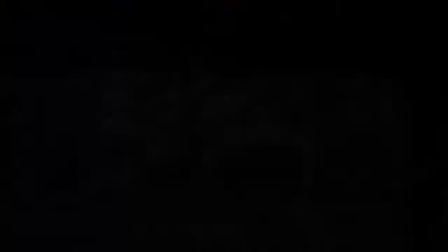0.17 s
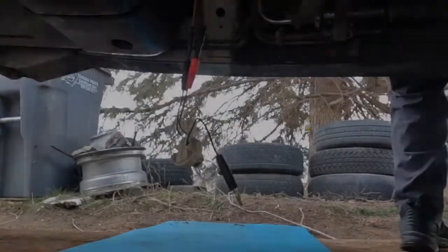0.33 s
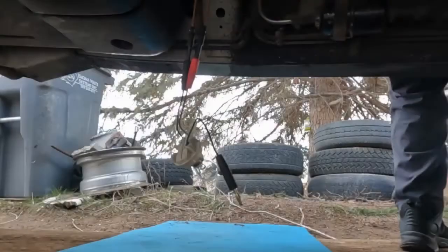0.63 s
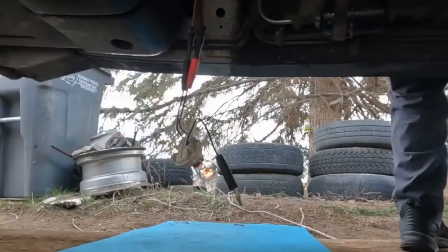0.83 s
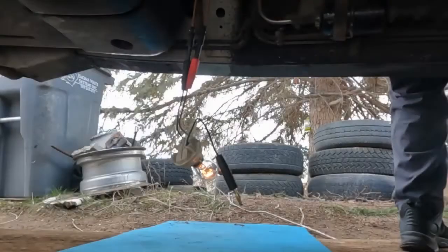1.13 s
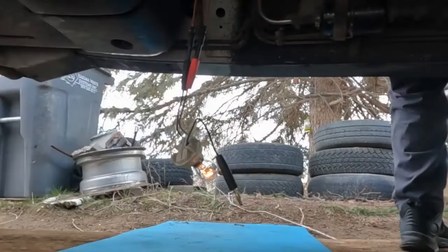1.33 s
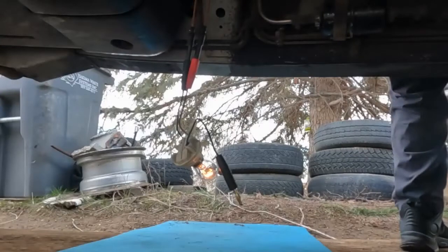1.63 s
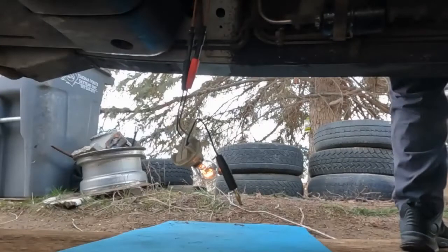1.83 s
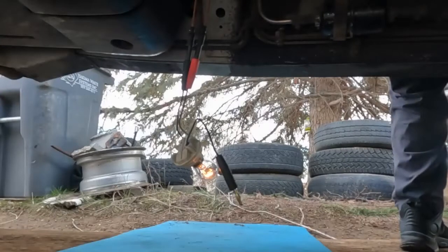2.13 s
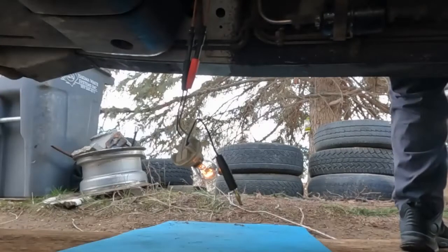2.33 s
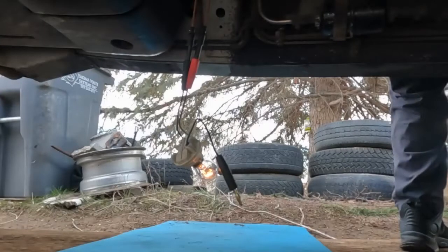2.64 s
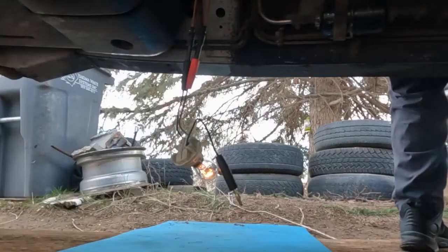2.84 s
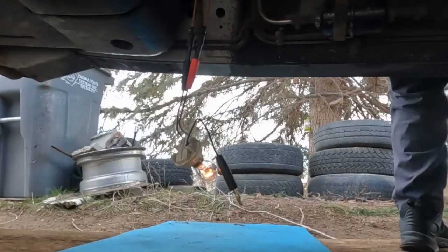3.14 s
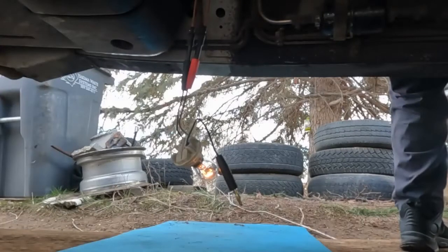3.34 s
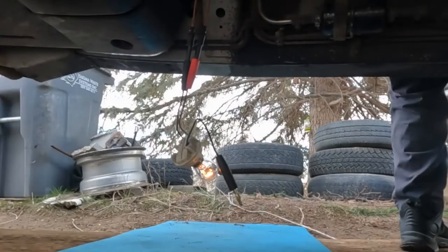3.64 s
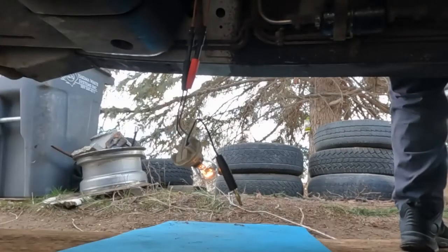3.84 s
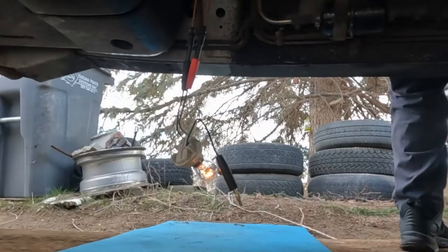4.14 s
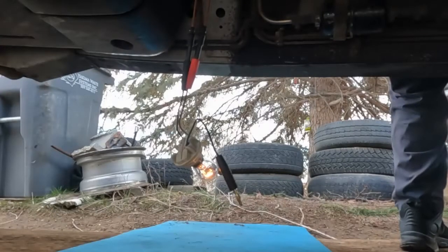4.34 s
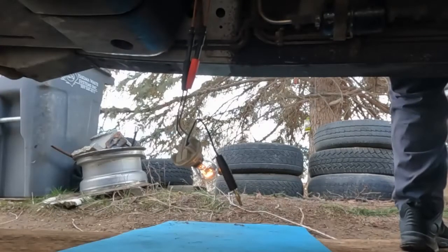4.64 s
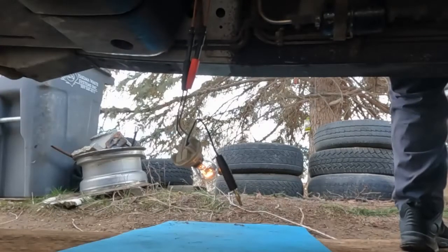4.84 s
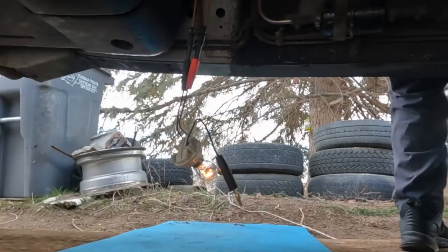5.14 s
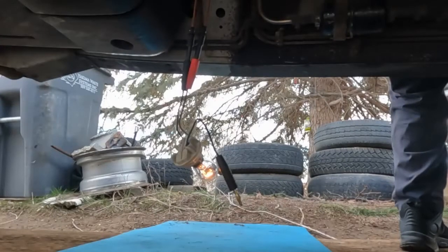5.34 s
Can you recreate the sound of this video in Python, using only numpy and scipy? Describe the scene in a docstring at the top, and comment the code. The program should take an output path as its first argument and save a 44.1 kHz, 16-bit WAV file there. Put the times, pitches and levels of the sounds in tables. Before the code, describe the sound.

The microphone sits beneath a parked vehicle outdoors, close to an electric fuel pump that gives a thin, steady buzz and hum throughout. Faint birds twitter in the distance in the first moments. At about 0.3 seconds a loud, dull thump and a short scuffle hit the microphone, with a low rumble that cuts off abruptly at 0.4 seconds. At 0.7 seconds the starter engages with a quick metallic clatter and spins up in a rising whine, and the hum swells briefly around 1.1 seconds. From 1.2 seconds the engine cranks in a fast, even rhythm, about five strokes a second. Each stroke has a soft knock, a grinding gear whine that dips in pitch, and a low exhaust puff. The engine never fires, and the cranking is still going at the end, around 5.5 seconds.

```python
"""Cranking without a start, under a parked vehicle

One microphone beneath the floor pan, close to the electric fuel pump, which buzzes throughout. Birds
twitter farther off and something thumps near the microphone. Then the starter engages and cranks the
engine, which never fires: every compression stroke loads and slows the pinion, whose teeth whine
through the bell housing, and ends in a low puff from the exhaust."""
import sys
import numpy as np
from scipy import signal
from scipy.fft import rfft, irfft, next_fast_len
from scipy.io import wavfile
from scipy.ndimage import uniform_filter1d, map_coordinates

SR = 44100
rng = np.random.default_rng(int(sys.argv[2]) if len(sys.argv) > 2 else 0)


def master(y):
    """Save y as 16-bit WAV."""
    cut = np.clip(np.atleast_2d(y).T, -1, 1)
    pcm = np.round(cut * 32767)  # scale
    wavfile.write(sys.argv[1], SR, pcm.astype(np.int16))


N = 241888

# compression strokes: start_s, top_tooth_hz, slowest_tooth_hz, knock_db
COMPRESSIONS = [(1.216, 1212, 884.4, -27.5), (1.444, 1375, 1107, -25), (1.604, 1365, 1093, -26),
                (1.787, 1396, 1084, -28), (1.972, 1325, 1092, -26), (2.135, 1375, 897.4, -27),
                (2.355, 1253, 926, -23), (2.563, 1323, 1106, -22), (2.725, 1399, 1048, -26),
                (2.911, 1345, 1054, -24.5), (3.097, 1374, 1082, -22), (3.273, 1317, 998.5, -26.5),
                (3.476, 1277, 1034, -23), (3.667, 1323, 1093, -24.5), (3.839, 1317, 1019, -25.5),
                (4.035, 1335, 1025, -23.5), (4.225, 1278, 1035, -24), (4.404, 1276, 1032, -25.5),
                (4.605, 1250, 1040, -26), (4.795, 1311, 1089, -26), (4.97, 1362, 1037, -26.5),
                (5.163, 1284, 1024, -28), (5.359, 1333, 1014, -22.5)]
USUAL_GAP_S = .19  # from stroke to stroke


def amp(db):
    """Gain of a level in dB."""
    return 10 ** (np.asarray(db) / 20)


def unit(x):
    """Scaled to rms 1."""
    return x / np.sqrt(np.mean(x ** 2) + 1e-20)


def curves(rows):
    """One value per sample for each column after the time."""
    s, *cols = np.transpose(rows)
    return [np.interp(np.arange(N) / SR, s, c) for c in cols]


def smooth(x, seconds):
    """Two running means round the corners."""
    size = max(int(seconds * SR), 1)
    return uniform_filter1d(uniform_filter1d(x, size), size)


def filtered(x, response):
    """x times a complex response of frequency."""
    m = next_fast_len(N + SR // 2)
    return irfft(rfft(x, m) * response(np.fft.rfftfreq(m, 1 / SR)), m)[..., :N]


def resonant(x, modes):
    """x through parallel resonances, neighbours in opposite phase, each with an optional lag."""
    out = np.zeros(N)
    for k, (hz, width, db, *lag_ms) in enumerate(modes):
        ring = signal.lfilter(*signal.iirpeak(hz, hz / width, SR), x)
        out += (-1) ** k * amp(db) * np.roll(ring, round(sum(lag_ms) * SR / 1000))
    return out


def noise(spectrum):
    """Noise of rms 1 coloured by rows of freq_hz, level_db."""
    f, db = np.transpose(spectrum)
    white = rng.standard_normal(N)
    return unit(filtered(white, lambda hz: amp(np.interp(np.log(hz + 1), np.log(f), db, -120))))


def wobble(rate):
    """A smooth random curve, rate knots a second."""
    return map_coordinates(rng.standard_normal(int(N * rate / SR) + 4), [np.arange(N) * rate / SR])


def clicks(turns, count):
    """One click per whole turn: the sum of count equal harmonics."""
    half = np.pi * (turns % 1) + 1e-9
    return np.sin((2 * count + 1) * half) / np.sin(half) - 1


def cranking():
    """The pinion runs fastest as a stroke takes load, slowest shortly before it lets go."""
    # starter spinning up: time_s, tooth_hz, load_db
    spin_up = [(0.7, 298, -64), (.715, 328.5, -24.5), (.78, 642, -40), (0.829, 851, -30), (0.871, 900, -41),
               (0.901, 982, -32), (0.959, 1117, -29), (1.031, 946, -28.5), (1.09, 725, -29.5),
               (1.123, 701, -33.5), (1.164, 920, -45)]
    load_db, loaded_share = -26.5, .63  # share of the time to the next stroke
    speed = [(s, hz) for s, hz, _ in spin_up]
    load = [(s, db) for s, _, db in spin_up]
    gaps = np.append(np.diff([row[0] for row in COMPRESSIONS]), USUAL_GAP_S)
    for (s, top_hz, low_hz, _), gap in zip(COMPRESSIONS, gaps):
        length = loaded_share * gap
        speed += [(s - .01, top_hz), (s + .015, top_hz), (s + .68 * length, low_hz * 1.02),
                  (s + .85 * length, low_hz), (s + length, low_hz * 1.02)]
        load += [(s - .006, load_db - 25), (s + .005, load_db + .82),
                 (s + length - .015, load_db - 4.5), (s + length + .014, load_db - 21)]
    running = np.arange(N) > spin_up[0][0] * SR
    return smooth(curves(speed)[0], .015), running * amp(curves(load)[0]), running


def starter(tooth_hz, load, running):
    """Unevenly worn teeth click into the housing; the armature sings at three times the tooth rate."""
    # bell housing and starter body: pitch_hz, width_hz, level_db
    housing_modes = [(622, 33, -2.5), (910, 56, -4.5), (1086, 51, -2), (1174, 16.5, 4.5), (1272, 44, -2.5),
                     (1421, 58, -3), (1653, 18, -0.5), (1775, 24, 2.5), (2010, 96, -4.5),
                     (2115, 490, -12.5), (2860, 58, -19.5), (3120, 146, -6), (7630, 95, 3.5)]
    # starter can: pitch_hz, width_hz, level_db
    can_modes = [(1780, 60, -7), (2775, 70, 1), (3100, 200, -16), (3600, 1100, -18)]
    # grinding gears: freq_hz, level_db
    grind_spectrum = [(60, -13), (200, 1), (350, -9.5), (640, -4.5), (850, -10), (1300, -9.5), (2200, -9.5),
                      (3500, -17), (5500, -14.5), (7200, -20), (7700, -27), (8300, -20), (15000, -28)]
    # brush hiss: freq_hz, level_db
    brush_spectrum = [(200, -32), (640, -0.5), (1000, -8), (1750, 2.5), (2400, -6), (4000, -6), (6000, -9),
                      (8000, -8.5), (10500, -15), (13000, -24), (15500, -36)]
    teeth = np.cumsum(tooth_hz * (1 + .0223 * wobble(120))) / SR
    tooth = np.floor(teeth + .5).astype(int)
    pinion_angle = 2 * np.pi * tooth / 11  # eleven teeth
    # the pinion runs out of true: lines each side of the whine
    runout = .82 * np.cos(pinion_angle) + .31 * np.cos(2 * pinion_angle + 1.3)
    wear = .64 * rng.standard_normal(tooth[-1] + 1)[tooth]
    rattle = unit(clicks(teeth, count=2)) * (1 + runout + wear)
    rattle += .5 * amp(2.1 * wobble(90)) * rng.standard_normal(N)
    whine = 1.29 * resonant(load * rattle, housing_modes)
    grind = smooth(load, .016) * (tooth_hz / 1200) ** .96 * amp(2.3 * wobble(70)) * noise(grind_spectrum)
    spin = np.cumsum(tooth_hz * (1 + .02055 * wobble(140))) / SR
    armature = np.sin(6 * np.pi * spin) * (1 + .26 * np.cos(pinion_angle)) * amp(4.3 * wobble(80))
    armature *= np.clip((tooth_hz - 600) / 300, 0, 1)  # comes in with speed
    armature *= np.clip((1330 - tooth_hz) / 200, .15, 1)  # fades as it races free
    brushes = running * amp(-42.5 + 2.3 * wobble(30)) * noise(brush_spectrum)
    return whine + amp(-8) * grind + amp(-28) * resonant(armature, can_modes) + brushes


def engine(load):
    """The engine knocks as slack is taken up, puffs down the pipe and shakes the floor pan under load."""
    # exhaust and floor pan: pitch_hz, width_hz, level_db
    underbody_modes = [(32, 10, -1), (97.3, 56, -12.5), (178, 53.6, -12)]
    first_puff_s, first_puff_db = .834, -16.5
    puff_after_s, puff_db, puff_db_per_s = .105, -22, 60  # louder after a longer wait
    t = np.arange(SR // 5) / SR
    out = np.zeros(N + SR)
    envelope = t / .012 * np.exp(1 - t / .013)
    for (s, *_, knock_db), (tuning, phase) in zip(COMPRESSIONS, rng.random((len(COMPRESSIONS), 2))):
        knock = np.sin(2 * np.pi * ((95 + 25 * tuning) * t + phase))
        knock += .32 * np.sin(2 * np.pi * (170 + 40 * phase) * t)
        out[round(s * SR):][:len(t)] += amp(knock_db - 5) * envelope * knock
    starts = np.array([row[0] for row in COMPRESSIONS])
    waits = np.diff(starts, prepend=starts[0] - USUAL_GAP_S)
    puffs = zip(starts + puff_after_s, puff_db + puff_db_per_s * (waits - USUAL_GAP_S))
    u = t - .06  # a suck, the push at u = 0, then the pipe swings out
    swing = np.where(u < 0, np.exp(-(u / .025) ** 2), np.exp(-u / .04))
    for s, db in [(first_puff_s, first_puff_db), *puffs]:
        out[round((s - .06) * SR):][:len(t)] += amp(db) * swing * np.cos(2 * np.pi * 34 * u)
    shake = (load + amp(-34) * (load > 0)) * unit(resonant(rng.standard_normal(N), underbody_modes))
    return out[:N] + amp(-9) * shake


def solenoid():
    """Solenoid and pinion slam in: each hit is a crack, ringing steel and a dull thud."""
    # hits as the starter engages: start_s, level_db
    slams = [(.707, -24.5), (.718, -22), (.735, -20.5), (.742, -16), (0.756, -23), (0.773, -24)]
    # struck steel: pitch_hz, level_db, t60_s
    steel_modes = [(331, 0.5, 0.1), (642, 3, 0.072), (1310, -7, 0.11), (1784, 5, 0.055), (2757, -10, 0.14),
                   (3930, -19, 0.073), (7450, -15, 0.21)]
    t = np.arange(SR // 4) / SR
    out = np.zeros(N + SR)
    for s, db in slams:
        ring = sum(amp(level + rng.normal(0, 4.6) - 60 * t / t60) * np.sin(2 * np.pi * hz * t)
                   for hz, level, t60 in steel_modes)
        crack = amp(-60 * t / .071) * signal.lfilter([1], [1, -.75], rng.standard_normal(len(t)))
        thud = amp(-60 * t / .11) * np.sin(2 * np.pi * rng.uniform(79, 230) * t)
        out[round(s * SR):][:len(t)] += amp(db - 7) * (.5 * ring + .5 * crack + 1.4 * thud)
    return out[:N]


def fuel_pump(tooth_hz):
    """One click a turn rings case and tank; a slower starter means lower voltage and a slower pump."""
    # case and tank, each part struck at its own moment of the turn: pitch_hz, width_hz, level_db, lag_ms
    case_modes = [(1410, 450, -14, 1), (1697, 60, 2.5, 2), (2655, 120, -2, 1), (3400, 160, -27, 3),
                  (4010, 208, 3.5, 2.5), (4720, 300, -5, 1.7), (4997, 120, 8.5, 0.14), (5296, 95, -4, 1.35),
                  (5604, 83, 1.5, 1.65), (6015, 108, 4, 2.7), (6740, 390, -7, 2), (7100, 580, -18, 2),
                  (8500, 240, -6, 2), (9570, 570, -1, 3.5), (10380, 164, 5.5, 1), (10603, 170, -1, 2),
                  (11460, 200, -2.5, 3), (12050, 400, -14, 3), (13420, 400, -3, 1.3), (14600, 300, -11, -6),
                  (14760, 440, -8.5, 4.5)]
    free_hz, settle_hz_per_s = 176.4, .65  # before the key is turned
    cranked_hz, droop_hz_per_s = 172.7, .18  # as the battery tires
    sags_s, recovers_s = .68, 5.3
    t = np.arange(N) / SR
    drained = np.clip((t - sags_s) / .08, 0, 1) - np.clip((t - recovers_s) / .18, 0, 1)
    hz = free_hz - settle_hz_per_s * np.minimum(t, sags_s)
    hz += drained * (cranked_hz - droop_hz_per_s * (t - sags_s) - hz)
    cranked = t > .8
    sag_hz = smooth(cranked * .008 * np.minimum(tooth_hz - 1130, 30), .02)
    turns = np.cumsum(hz + sag_hz + (.101 + .1204 * cranked) * wobble(30)) / SR
    case_shaking = amp(-17 + 7 * drained) * rng.standard_normal(N)
    drive = unit(clicks(turns, count=90)) + case_shaking
    buzz = amp(-36 - 2 * drained) * unit(resonant(drive, case_modes))
    swell_db = 16.5 * np.exp(-((t - 1.1) / .059) ** 2)  # the hum swells once as the starter labours
    hum_db = -45.5 - 4 * drained + swell_db + .69 * wobble(33)
    hum = np.sqrt(2) * (np.sin(2 * np.pi * turns) + .081 * np.sin(4 * np.pi * turns))
    return buzz + amp(hum_db) * hum


def bumps():
    """Soft contacts at the microphone, then a fading scuffle: a cycle and a half of low push each."""
    # dull thumps: start_s, level_db, pitch_hz
    thumps = [(.29, -11, 257), (.295, -2.5, 225), (0.309, -10, 194), (.357, -13.5, 338)]
    from_s, to_s, count = .32, .405, 7  # the scuffle
    timing, softness, tuning = rng.random((count, 3)).T
    along = (np.arange(count) + timing) / count
    scuffle = zip(from_s + along * (to_s - from_s), -15.5 - 13 * along * softness, 190 + 150 * tuning)
    t = np.arange(SR // 20) / SR
    out = np.zeros(N + SR)
    for s, db, hz in [*thumps, *scuffle]:
        cycles = t * hz
        envelope = np.exp(-((cycles - .85) / .73) ** 2) * np.clip(2 * cycles, 0, 1)
        out[round(s * SR):][:len(t)] -= amp(db) * envelope * np.sin(2 * np.pi * (cycles - .28))
    return filtered(out[:N], lambda hz: 1j * hz / (70 + 1j * hz))  # low cut


def birds():
    """Faint gliding whistles some way off, with a short echo."""
    # bird notes: start_s, length_s, start_hz, end_hz, level_db
    notes = [(0.056, 0.077, 4050, 2960, -47), (0.121, 0.021, 3500, 4700, -42),
             (0.129, 0.046, 3900, 3930, -44), (0.157, 0.03, 3100, 3500, -45.5),
             (0.204, 0.03, 3400, 4450, -45.5), (0.243, 0.051, 4300, 3910, -46),
             (0.65, .05, 4400, 3280, -48), (3.407, 0.091, 4100, 2506, -50), (5.27, 0.091, 4100, 2422, -49)]
    flutter_hz = 110 * wobble(260)  # makes the notes slightly scratchy
    out = np.zeros(N + SR)
    for s, length, start_hz, end_hz, db in notes:
        u = np.linspace(0, 1, round(length * SR))
        hz = start_hz + (end_hz - start_hz) * u * u * (3 - 2 * u) + flutter_hz[round(s * SR):][:len(u)]
        envelope = np.sqrt(np.sin(np.pi * u).clip(0))
        out[round(s * SR):][:len(u)] += amp(db + 6.5) * envelope * np.sin(2 * np.pi * np.cumsum(hz) / SR)
    t = np.arange(SR // 5) / SR
    echo = rng.standard_normal(len(t)) * amp(-32 - 60 * t / .28)
    echo[0] = 1  # direct sound
    return signal.fftconvolve(out, echo)[:N]


def background():
    """Low rumble and rustle swell, cut off abruptly at 0.41 s, then stay quiet; the microphone hisses."""
    # rumble and rustle: time_s, rumble_db, rustle_db
    levels = [(0, -52, -45.5), (.1, -41.5, -46), (.2, -45, -46), (.28, -43, -42), (.3, -29, -36.5),
              (.405, -30, -37), (.415, -52, -53), (.7, -51.5, -48)]
    # rustle: freq_hz, level_db
    rustle_spectrum = [(150, 13), (300, 8), (700, 2.5), (2000, -12), (3500, -8.5), (6000, -27)]
    rumble_spectrum = [(28, -25), (50, -2), (75, 1), (150, -1.5), (260, -13), (500, -39)]  # same columns
    rumble_db, rustle_db = curves(levels)
    rumble = amp(rumble_db + 1.7 * wobble(16)) * noise(rumble_spectrum)
    rustle = amp(rustle_db + 2.2 * wobble(25)) * noise(rustle_spectrum)
    return rumble + rustle + amp(-53) * rng.standard_normal(N)


def scene():
    """One microphone under the vehicle feeds both channels."""
    tooth_hz, load, running = cranking()
    vehicle = starter(tooth_hz, load, running) + fuel_pump(tooth_hz) + engine(load) + solenoid()
    mono = vehicle + bumps() + birds() + background()
    return np.array([mono, mono])


def record(dry):
    """The recorder thins the deepest bass and keeps nothing above its band limit."""
    low_cut_hz, top_hz = 12, 15750
    return filtered(dry, lambda hz: (hz < top_hz) * hz / (hz + low_cut_hz))


dry = scene()
out = record(dry)
master(out)
```